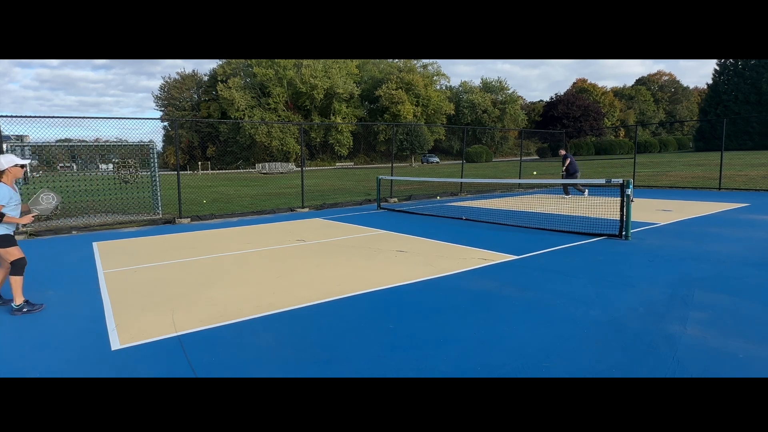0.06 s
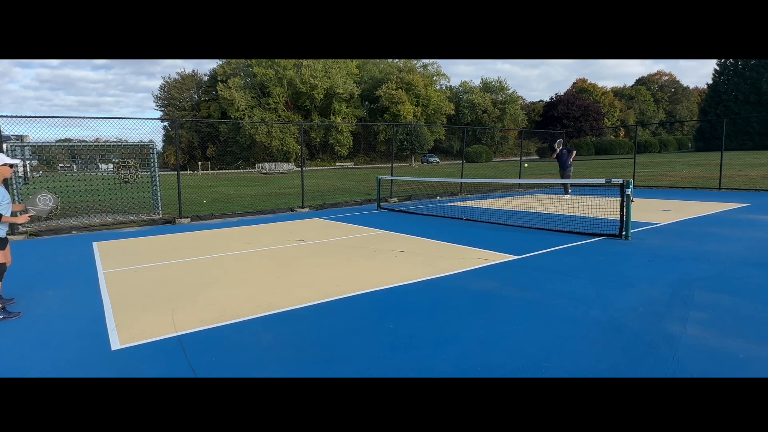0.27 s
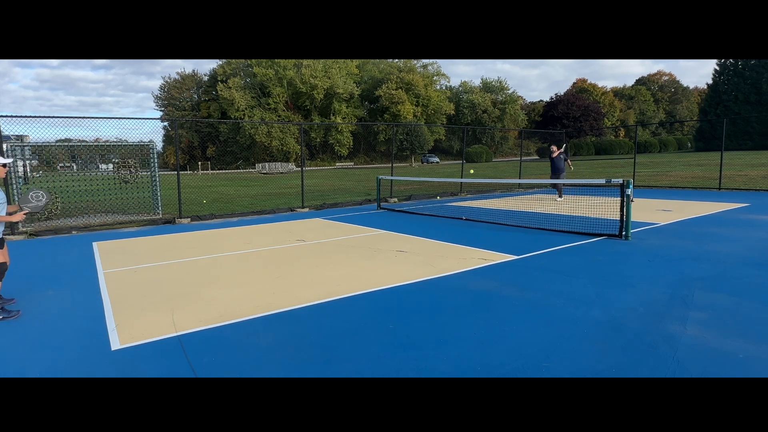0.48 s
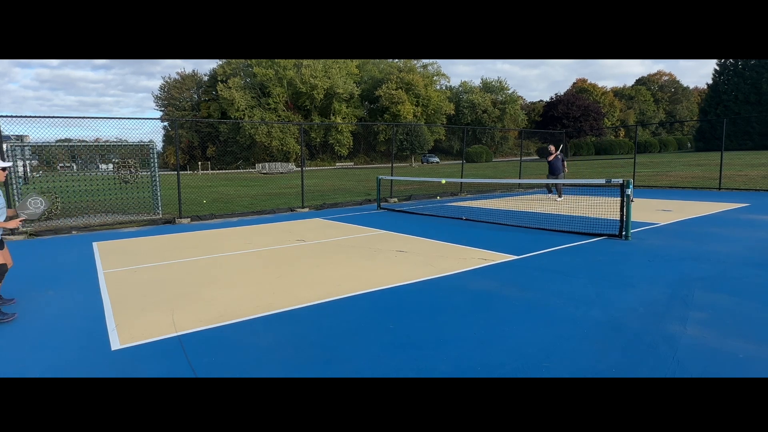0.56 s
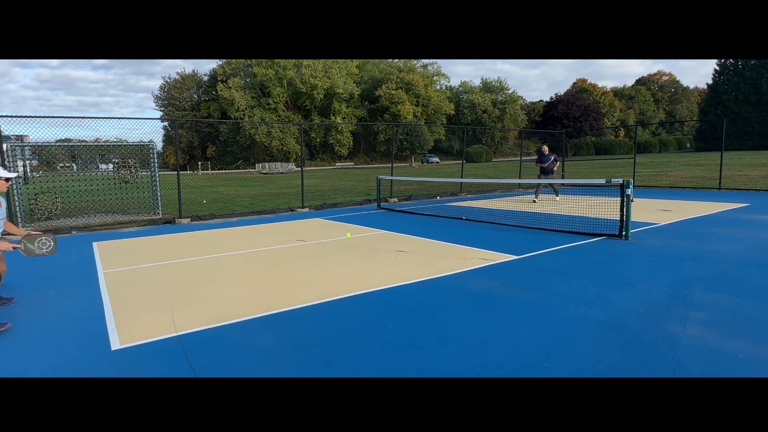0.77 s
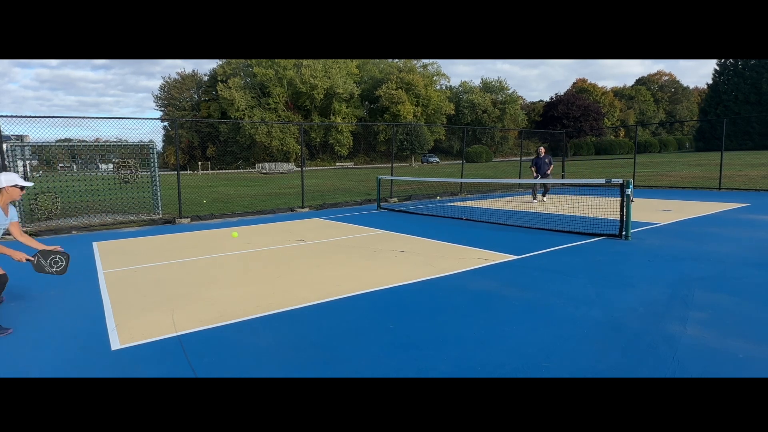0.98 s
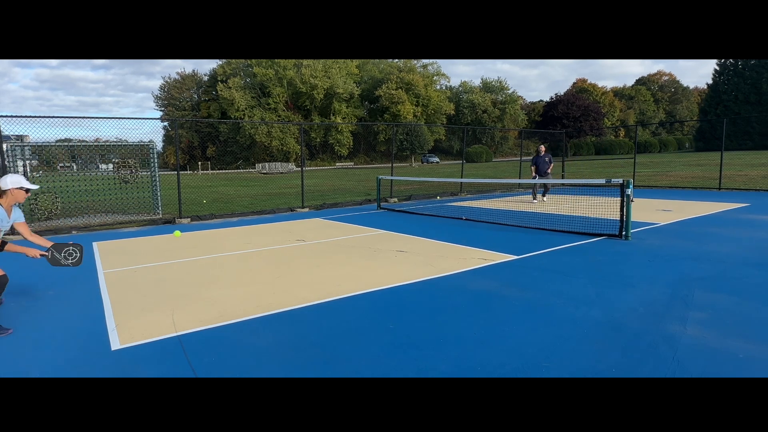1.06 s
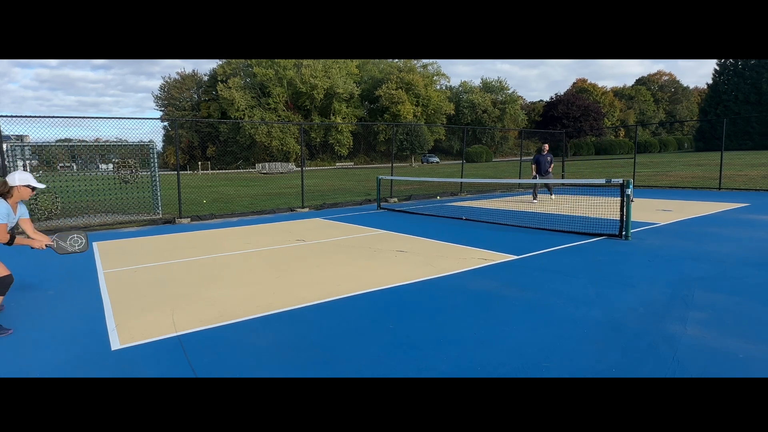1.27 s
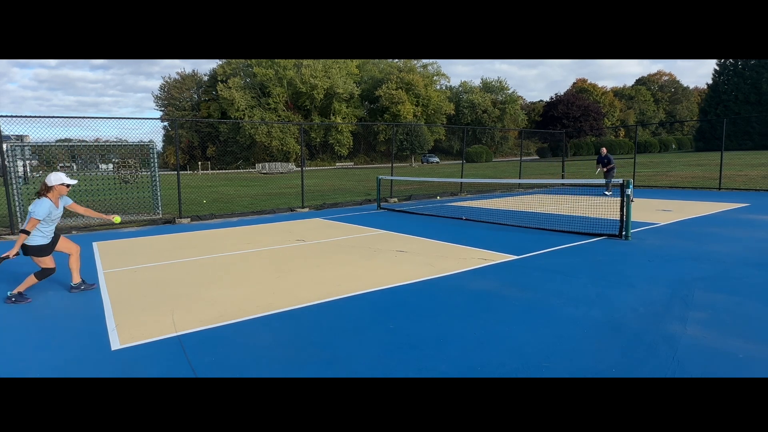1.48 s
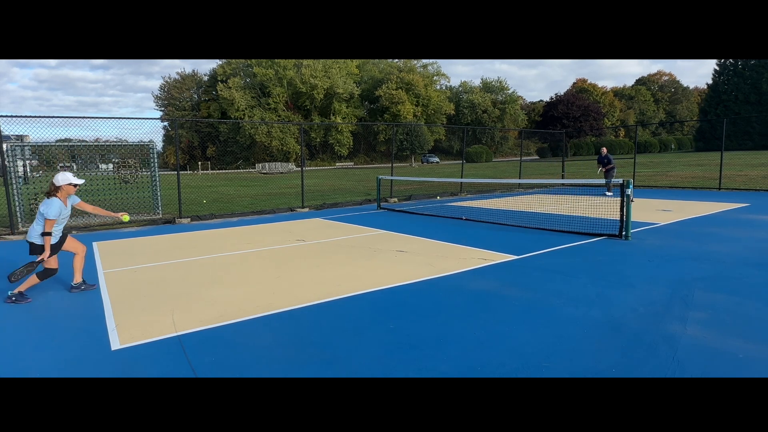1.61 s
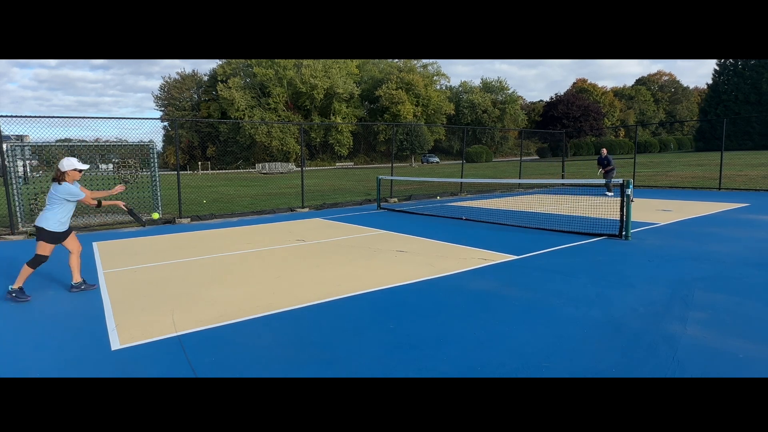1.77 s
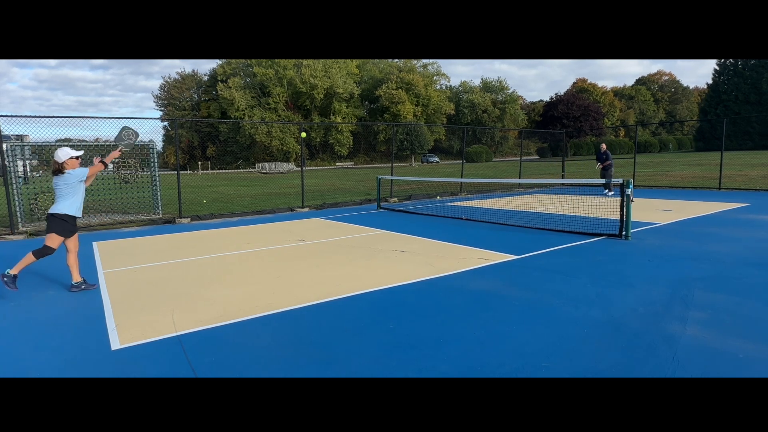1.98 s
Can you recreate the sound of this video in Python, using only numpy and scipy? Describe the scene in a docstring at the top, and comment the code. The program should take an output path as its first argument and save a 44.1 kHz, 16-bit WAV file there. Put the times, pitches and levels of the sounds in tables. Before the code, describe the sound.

A pickleball pops sharply off a far paddle at about 0.2 seconds, with a short outdoor echo. Small ticks and faint shoe scuffs and thuds follow. At 1.2 seconds the hollow ball bounces on the hard court close by, and at 1.8 seconds the near paddle returns it with a crisp knock. A faint distant rumble runs throughout, and light wind touches the microphone from about 1.5 seconds.

```python
"""Pickleball on an outdoor hard court.

Heard beside the near baseline, the far paddle pops, the hollow ball bounces close by and the near
paddle returns it. Each impact excites damped modes, which fences and trees reflect and scatter.
Shoes scuff and thud, a few small ticks sound, and light wind touches the microphone
over a distant rumble."""
import sys
import numpy as np
from scipy import signal
from scipy.fft import rfft, irfft
from scipy.io import wavfile

SR = 44100
rng = np.random.default_rng(int(sys.argv[2]) if len(sys.argv) > 2 else 0)


def dump(signal):
    """Clip the signal to [-1, 1] and save it as 16-bit WAV at the path in sys.argv[1]."""
    limited = np.clip(np.atleast_2d(signal).T, -1, 1)
    pcm = np.round(limited * 32767).astype(np.int16)
    wavfile.write(sys.argv[1], SR, pcm)


N = 90404
T = np.arange(N) / SR
FREQS = np.maximum(np.fft.rfftfreq(N, 1 / SR), 1)

# Modes of struck bodies. Each row: frequency in Hz, level in dB, T60 in seconds, pan in dB.
# T60 is the time to decay by 60 dB; pan is the left level minus the right.
FAR_PADDLE = [(265, -22, 0.021, 0), (439.3, -1.5, 0.0077, 3), (1230, -17, 0.013, -18.5),
              (1599, -8, 0.013, -15), (1747, -6, 0.0056, -26.5), (2113, -19.5, 0.0042, 6.5),
              (2490, -17, 0.009, 16), (3930, -15.5, 0.0064, -5.5), (5320, -28.5, 0.01, 15.5),
              (6160, -24.5, 0.011, -11), (8450, -28.5, 0.0055, -1), (9930, -30.5, 0.008, -7.5),
              (13800, -33.5, .003, -6)]
BALL_ON_COURT = [(219.7, -6.5, 0.011, -2), (319, -9.5, 0.028, 3), (985, -3.5, 0.022, 7),
                 (1148, 2, 0.013, 4), (1834, -13, 0.017, 0), (2694, -20, 0.012, 8.5),
                 (3320, -28.5, 0.02, 8.5), (4610, -23, 0.01, 12), (4840, -29, 0.009, 15),
                 (6170, -36, 0.0098, 23.5), (9800, -48, 0.025, 22), (13800, -31, 0.0045, 3)]
NEAR_PADDLE = [(512, -22, 0.024, 6), (1015, -12, 0.027, 9), (1092, 0.5, 0.013, 6.5),
               (1368, -17.5, 0.02, -9), (1842, 1, .011, 2.5), (2630, -22.5, 0.016, 5.5),
               (3210, -16.5, 0.01, 10), (3860, -18.5, 0.013, 4.5), (4480, -23, 0.015, 8),
               (4760, -15, 0.0097, 6), (5180, -13, .011, 8), (6360, -37, 0.011, 9.5),
               (8900, 5.5, 0.0017, 3), (9200, -33, 0.015, 0), (13570, -18, 0.0064, 3),
               (16000, -47, .005, -16)]
TICK_MODES = [(297.5, -23, 0.0095, -9), (480, -20.5, 0.0082, -2.5), (1930, -24, 0.0047, -2),
              (2740, -28, 0.017, -4), (4020, -42, 0.014, 2), (6400, -44, 0.027, 5), (9550, -24, 0.0028, 2),
              (15500, -23.5, 0.0016, -15)]
# Blows of the ball. Each row: start in seconds, modes, ring level in dB, lead of the left ear in ms,
# swell in seconds, crack level in dB, fence tail gain in dB, its T60 in seconds, its treble in dB,
# tree tail gain in dB.
IMPACTS = [(.2362, FAR_PADDLE, 3, -0.2, 0.0021, -25, -11.5, 0.36, 0.5, -23.5),
           (1.2106, BALL_ON_COURT, -3, 0.32, 0.0018, -32.5, -17.5, 0.4, 1, -30.5),
           (1.7751, NEAR_PADDLE, -1, 0.27, 0.0047, -23.5, -13, 0.3, -2.5, -23.5)]
# Echoes of the latest blow. Each row: arrival in seconds, gain in dB, pan in dB, band centre in Hz.
REFLECTIONS = [(0.249, -27, 6, 1920), (0.2596, -18.5, 17, 1220), (0.2648, -33, -7, 1600),
               (0.2689, -16.5, 3, 1200), (0.2784, -27, -18, 1390), (.2948, -33.5, 18, 1360),
               (0.3073, -41, 30, 1600), (0.3113, -27.5, -9, 1190), (.3255, -33, 0, 1210),
               (0.3410, -30, 14, 1280), (0.4535, -37.5, 3, 1570), (.4600, -31, 2, 1550),
               (0.5528, -38, 5.5, 1520), (0.6345, -36, -6, 1740), (1.2272, -23, 6, 2250),
               (1.2532, -33, 17, 1100), (1.2598, -34.5, 4, 900), (1.2638, -35.5, 13, 1340),
               (1.3228, -37.5, 9, 1190), (1.3448, -39.5, 7, 1100), (1.7904, -12, 1, 2250),
               (1.8178, -27.5, 18, 1000), (1.8346, -23, 7, 2100), (1.8632, -37, -14, 2400)]
# Small ticks. Each row: start in seconds, level in dB, pan in dB, low cut in Hz, high cut in Hz,
# relative level of the bare click in dB.
TICK_EVENTS = [(0.3308, -1.5, 16, 2360, 4250, -26), (0.3341, -0.5, 6, 2050, 5540, -15.5),
               (0.8364, -3.5, 8, 116, 18800, -24.5), (1.2020, -15, -2, 910, 12900, -19),
               (1.393, -40.5, -10, 900, 13200, -3.5)]
# Sliding soles. Each row: start, rise, hold and T60 in seconds, level in dB, pan in dB,
# top-octave gain in dB, height of a spectral peak in dB, its centre in Hz.
SOLE_SLIDES = [(0., 0.028, .0, 0.19, -57, -0.5, 17.5, -8, 5000),
               (0.1, 0.0024, 0.0082, 0.19, -51.5, 0.5, 2, 10.5, 4740),
               (0.168, 0.0016, 0.028, 0.094, -53.5, 6.5, -7.5, 9, 3780),
               (0.403, 0.0091, 0.07, 0.25, -61, 4.5, -24, 2.5, 4800),
               (0.717, 0.009, 0.025, 0.1, -56, 2.5, -3, 9, 5260),
               (0.819, 0.052, 0.083, 0.94, -54, 5, 7, 7.5, 5730),
               (1.597, 0.032, 0.078, 0.64, -68.5, 1, 12, 2, 5070),
               (1.976, 0.013, 0.003, .4, -69.5, 10, -14.5, 7, 5100),
               (.605, 0.0061, 0.015, 0.16, -61.5, 0.5, -15, 2, 4200)]
# Footfalls. Each row: start in seconds, frequency in Hz, level in dB, T60 in seconds, pan in dB.
FOOTFALLS = [(0.169, 147.7, -35, 0.098, 9.5), (0.274, 64.4, -31.5, 0.18, -2),
             (0.362, 57.5, -33.5, 0.25, 19.5), (0.366, 208, -25.5, 0.024, 11),
             (.372, 126, -23, 0.031, 12.5), (0.435, 218, -32.5, 0.029, 16.5), (.540, 95, -25, 0.032, 8),
             (0.797, 215, -17, 0.0098, 0.5), (1.293, 101, -26, 0.053, 12.5), (1.395, 204, -35.5, 0.059, 16),
             (1.541, 323, -38, 0.026, 25), (1.658, 259, -26, 0.016, 15.5), (1.834, 281, -28, 0.035, 16.5),
             (1.839, 177, -38, 0.078, 19), (1.937, 84, -35.5, 0.13, 17)]
# Spectra of the noises. Each row: frequency in Hz, relative level in dB.
CRACK_SPECTRUM = [(800, -13), (2500, -17.5), (6000, -10), (7300, -20.5), (9000, -5), (11300, -26.5),
                  (13800, -12), (16000, -8.5)]
TAIL_SPECTRUM = [(100, -7), (400, -1.5), (1000, -2), (2000, -8.5), (6000, 3.5), (10000, 1.5),
                 (11500, -30.5), (14000, -4), (16000, -6)]
HISS_SPECTRUM = [(300, 11), (800, 14), (1800, 14.5), (3500, 10.5), (4600, 8), (5700, 8.5), (8000, 1.5),
                 (10000, -3), (11500, -41.5), (14000, -2), (16000, -11.5)]
RUMBLE_SPECTRUM = [(15, -58.5), (25, -8), (38, 12.5), (92, 14.5), (130, 3.5), (427, -16.5), (545, -17),
                   (1040, -17), (1160, -18), (1650, -25), (2000, -33.5), (3620, -40), (16000, -93)]
WIND_SPECTRUM = [(30, -22), (80, 1), (170, 4), (350, -7), (600, -17.5), (1200, -44), (4000, -59.5)]
# Envelopes of the faint hiss and the wind. Each row: time in seconds, level in dB.
HISS_LEVELS = [(0, -66.5), (.5, -69.5), (.8, -67.5), (1.25, -60), (1.42, -111), (2.05, -94.5)]
WIND_LEVELS = [(0, -70.5), (1.35, -60), (1.43, -54.5), (1.52, -47.5), (1.6, -49.5), (1.66, -45.5),
               (1.79, -51.5), (1.85, -43), (2.05, -52.5)]

CONTACT_S, QUICK_HZ = 0.00038, 2700  # modes are driven while the ball touches; higher ones swell sooner
LEAD_BELOW_HZ = 7000  # higher modes reach both ears together
CRACK_T60_S = 0.031
REBOUND_S, REBOUND_DB = 0.00536, -9.5  # the bounce sounds a second time at once
TAIL_DELAY_S, TAIL_RISE_S, TAIL_FLUTTER_DB, TAIL_PAN_DB = 0.011, 0.0037, 3, 2.5
TREE_T60_S, TREE_TREBLE_DB = 1, -12
ECHO_WIDTH, ECHO_SPREAD = 0.85, 0.21  # bandwidth over band centre; smear T60 over delay
SCATTER_DB, SCATTER_AT_S = -2, 0.11  # scattered part against the clean one, at this delay
SOLE_WIDTH_HZ, GRIT_HZ, GRIT_DB, FOOT_SWELL_S = 580, 500, 2.5, 0.0036
RUMBLE_DB, RUMBLE_PAN_DB, BREEZE_DB, BREEZE_HZ = -43.5, 1.5, 1, 8
WIND_FLUTTER_DB, WIND_PAN_DB = 2.5, 9
LOW_CUT_HZ, HIGH_CUT_HZ = 54, 16300


def ball_impacts():
    """Impact excitation: each blow gives a broadband crack and a brief ring, which the court reflects."""
    out = 0
    ends = [row[0] for row in IMPACTS[1:]] + [np.inf]
    for (start, modes, db, lead_ms, swell_s, crack_db, *tail), end in zip(IMPACTS, ends):
        crack = undb(crack_db) * noise(colour(CRACK_SPECTRUM)) * fade(T, CRACK_T60_S)
        direct = undb(db) * ring(modes, lead_ms, swell_s) + crack
        out = out + later(direct + court_tail(direct, *tail), start)
        if modes is BALL_ON_COURT:
            out += undb(REBOUND_DB) * later(direct, start + REBOUND_S)
        centred = undb(db) * ring(modes, 0, swell_s).mean(axis=0) + crack
        for arrival, echo_db, side, hz in REFLECTIONS:
            if start < arrival < end:
                band = 1 / (1 + ((FREQS / hz - hz / FREQS) / ECHO_WIDTH) ** 2)
                echo = later(scattered(centred, arrival - start), arrival)
                out += undb(echo_db) * pan(side) * shape(echo, band)
    return out


def ring(modes, lead_ms=0, swell_s=0.00078):
    """Modal superposition: a struck body sounds as a sum of damped sinusoids; one ear may lead."""
    out = 0
    ear_lag_s = np.maximum([[-lead_ms], [lead_ms]], 0) / 1000
    for hz, db, t60, side in modes:
        t = np.maximum(T[:N // 4] - ear_lag_s * (hz < LEAD_BELOW_HZ), 0)
        swell = 1 - np.exp(-(t * (1 + hz / QUICK_HZ) / swell_s) ** 2)
        decay = fade(np.hypot(t, CONTACT_S) - CONTACT_S, t60)
        out = out + undb(db) * pan(side) * np.sin(2 * np.pi * hz * t) * swell * decay
    return np.pad(out, ((0, 0), (0, N - N // 4)))


def court_tail(direct, fence_db, fence_t60, treble_db, tree_db):
    """Reverberation: dense scatter from the fences gives way to a faint, hollow return from trees."""
    swell = 1 - np.exp(-np.maximum(T - TAIL_DELAY_S, 0) / TAIL_RISE_S)
    flutter = undb(TAIL_FLUTTER_DB * wander(rate_hz=220))
    fences = spectral_envelope(direct, width_octaves=1) * shelf(2800, treble_db)
    trees = spectral_envelope(direct, width_octaves=0.2) * shelf(3400, TREE_TREBLE_DB)
    out = 0
    for db, t60, spectrum in [(fence_db, fence_t60, fences), (tree_db, TREE_T60_S, trees)]:
        decay = fade(T, t60)
        diffuse = shape(rng.standard_normal((2, N)), spectrum * colour(TAIL_SPECTRUM))
        out = out + undb(db) * decay / np.linalg.norm(decay) * diffuse
    return out * swell * flutter * pan(TAIL_PAN_DB)


def scattered(x, delay_s):
    """Diffuse reflection: rough surfaces smear an echo in time and pitch; the farther, the more."""
    grains = rng.standard_normal(N) * fade(T, ECHO_SPREAD * delay_s)
    smear = shape(grains / np.linalg.norm(grains), spectral_envelope(x, width_octaves=1))
    share = undb(SCATTER_DB) * delay_s / SCATTER_AT_S
    return (x + share * smear) / np.hypot(1, share)


def ticks():
    """Impulse response: a click and its short ring, band-limited to a dull or bright tick."""
    body, out = ring(TICK_MODES), 0
    for start, db, side, low_hz, high_hz, click_db in TICK_EVENTS:
        tick = body + undb(click_db) * signal.unit_impulse(N)
        band = signal.butter(2, [low_hz, high_hz], "band", fs=SR, output="sos")
        out = out + undb(db) * pan(side) * signal.sosfilt(band, later(tick, start))
    return out


def shoe_scuffs():
    """Sliding friction: soles hiss over the court, and its grit modulates the amplitude."""
    out, grit = 0, undb(GRIT_DB * wander(GRIT_HZ))
    for start, rise, hold, t60, db, side, top_db, peak_db, peak_hz in SOLE_SLIDES:
        peak = np.exp(-((FREQS - peak_hz) / SOLE_WIDTH_HZ) ** 2)
        spectrum = colour(HISS_SPECTRUM) * undb(peak_db * peak) * shelf(9500, top_db)
        envelope = np.clip((T - start) / rise, 0, 1) * fade(T - start - rise - hold, t60)
        out = out + undb(db) * pan(side) * grit * envelope * noise(spectrum)
    return out


def foot_thuds():
    """Damped oscillation: each landing foot excites a single low mode."""
    return sum(later(ring([(hz, db, t60, side)], swell_s=FOOT_SWELL_S), start)
               for start, hz, db, t60, side in FOOTFALLS)


def outdoors():
    """Ambient noise: wind flutters on the microphone, mostly left, over distant rumble and hiss."""
    rumble_db = RUMBLE_DB + BREEZE_DB * wander(BREEZE_HZ)
    rumble = undb(rumble_db) * pan(RUMBLE_PAN_DB) * noise(colour(RUMBLE_SPECTRUM))
    hiss_db = np.interp(T, *np.array(HISS_LEVELS).T)
    hiss = undb(hiss_db) * pan(3) * noise(colour(HISS_SPECTRUM))
    wind_db = np.interp(T, *np.array(WIND_LEVELS).T) + WIND_FLUTTER_DB * wander(rate_hz=15)
    wind = undb(wind_db) * pan(WIND_PAN_DB) * noise(colour(WIND_SPECTRUM))
    return rumble + hiss + wind


def undb(db):
    """Amplitude ratio for a level in decibels."""
    return 10 ** (np.asarray(db) / 20)


def pan(db):
    """Left and right gains for an interaural level difference."""
    return undb(np.array([[db], [-db]]) / 2)


def fade(t, t60):
    """Exponential decay from t = 0."""
    return np.exp(-np.log(1000) * np.maximum(t, 0) / t60)


def later(x, seconds):
    """Pure delay of a stereo sound."""
    samples = int(np.clip(round(seconds * SR), 0, N))
    return np.pad(x, ((0, 0), (samples, 0)))[:, :N]


def shape(x, gain):
    """Filtering by multiplication of the spectrum."""
    return irfft(rfft(x) * gain, N)


def colour(points):
    """Frequency response interpolated through (Hz, dB) points."""
    hz, db = np.array(points).T
    return undb(np.interp(np.log(FREQS), np.log(hz), db))


def shelf(hz, db):
    """Shelving response that raises or lowers everything above a corner."""
    return undb(db / (1 + (hz / FREQS) ** 8))


def spectral_envelope(x, width_octaves):
    """Magnitude spectrum, with the power smoothed over log frequency."""
    octaves = np.linspace(0, np.log2(SR / 2), 3000)
    power = np.interp(2 ** octaves, FREQS, np.mean(abs(rfft(x)) ** 2, axis=0))
    window = np.exp(-.5 * ((octaves - octaves.mean()) / (width_octaves / 2)) ** 2)
    smoothed = np.convolve(power, window / window.sum(), "same")
    return np.sqrt(np.interp(np.log2(FREQS), octaves, smoothed))


def noise(spectrum):
    """Uncorrelated left and right noise of unit variance."""
    x = shape(rng.standard_normal((2, N)), spectrum)
    return x / x.std()


def wander(rate_hz):
    """Low-pass noise of about unit variance, for random modulation."""
    return noise(np.exp(-(FREQS / rate_hz) ** 2))[0]


def scene():
    """Superposition: the pressures of the rally and its surroundings add."""
    return ball_impacts() + ticks() + shoe_scuffs() + foot_thuds() + outdoors()


def record(dry):
    """Band limiting: the recorder cuts the deepest bass and the highest treble."""
    high_pass = signal.butter(2, LOW_CUT_HZ, "high", fs=SR, output="sos")
    low_pass = signal.ellip(10, .1, 80, HIGH_CUT_HZ, fs=SR, output="sos")
    return signal.sosfilt(low_pass, signal.sosfilt(high_pass, dry))


dry = scene()
out = record(dry)
dump(out)
```